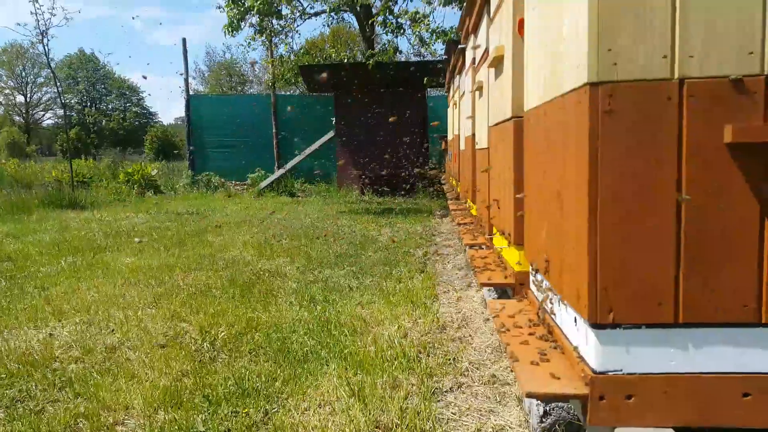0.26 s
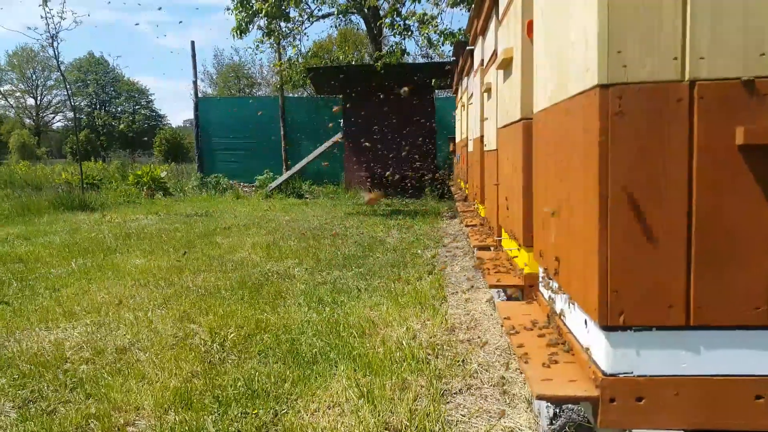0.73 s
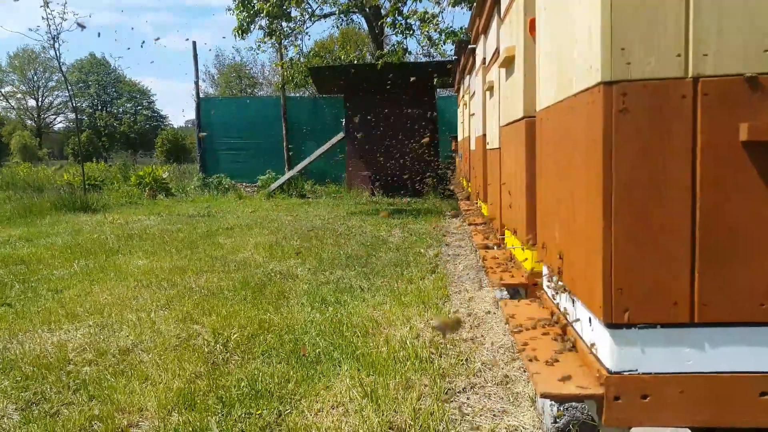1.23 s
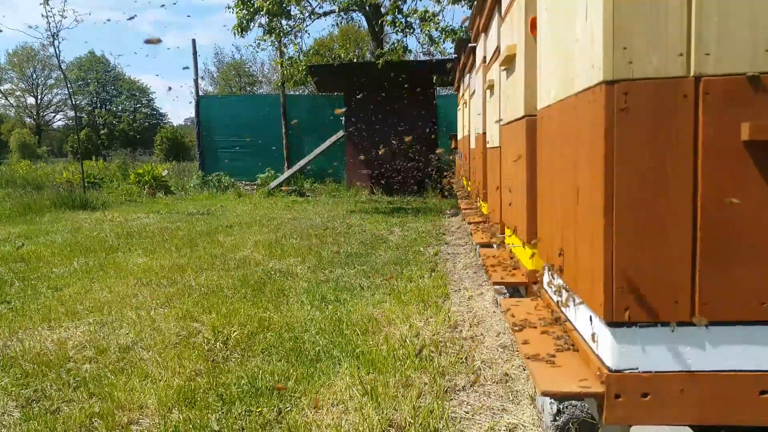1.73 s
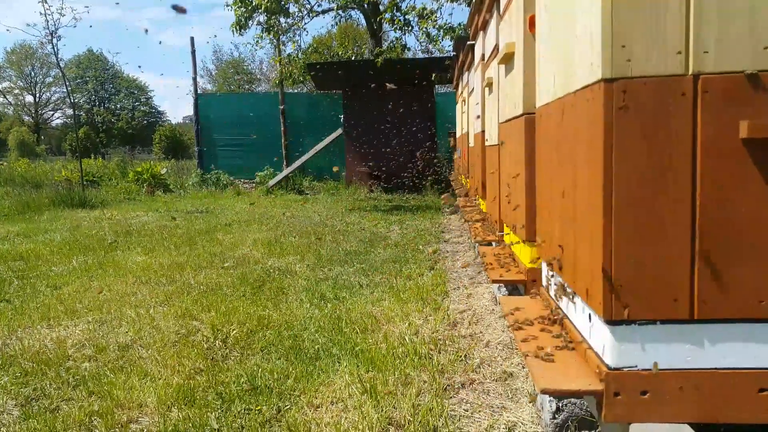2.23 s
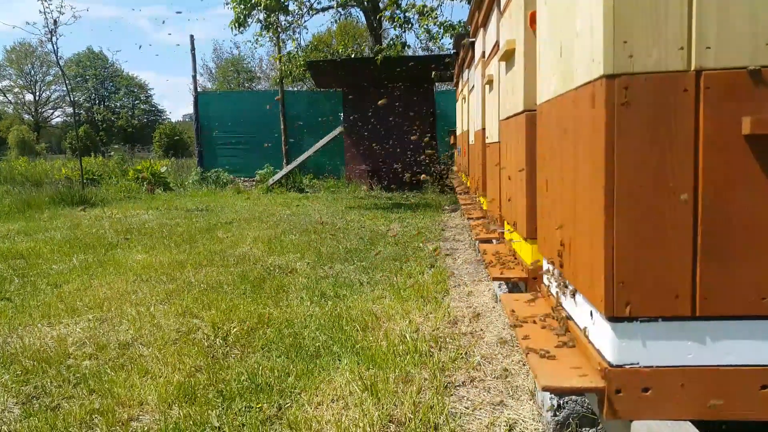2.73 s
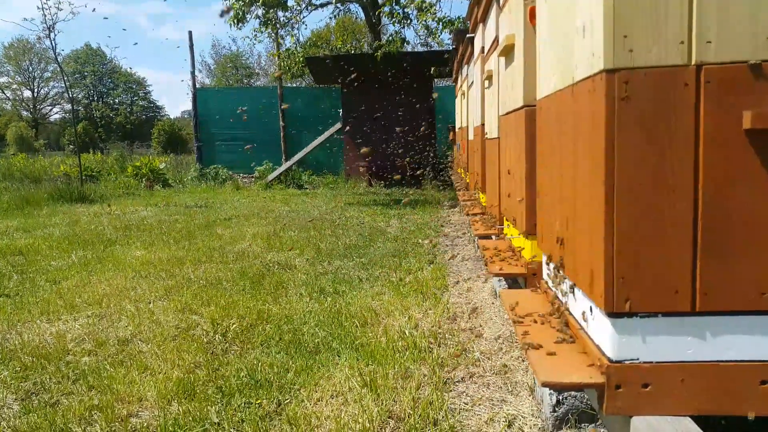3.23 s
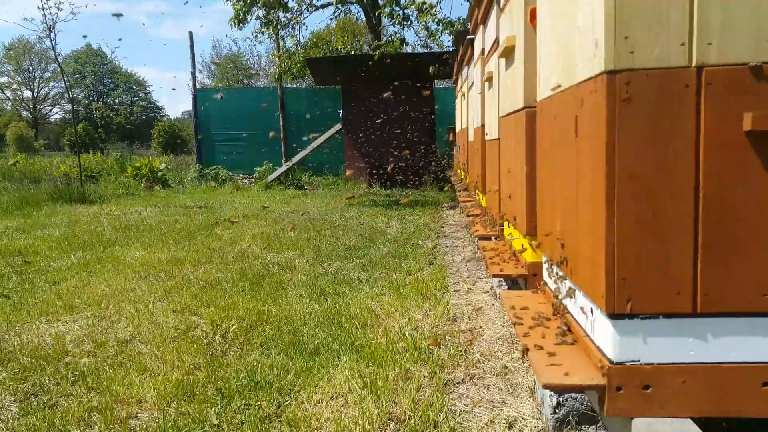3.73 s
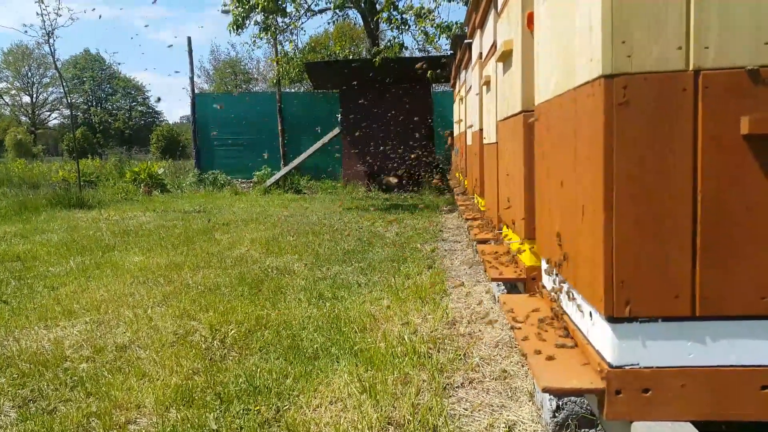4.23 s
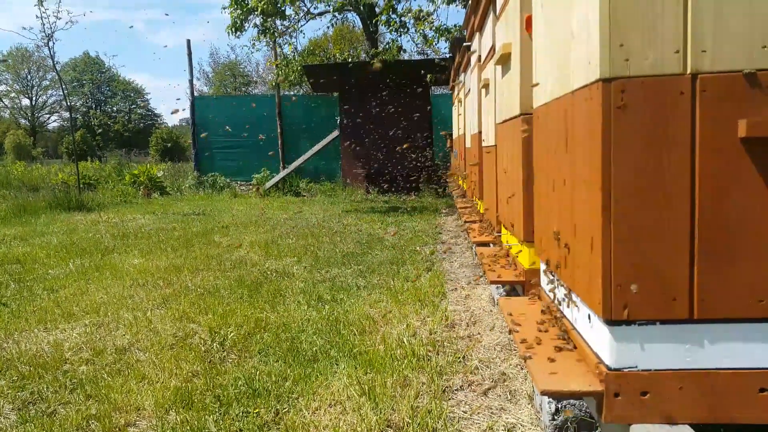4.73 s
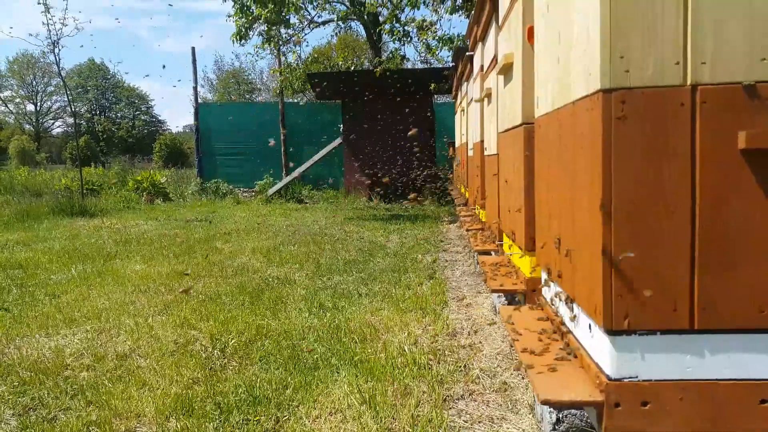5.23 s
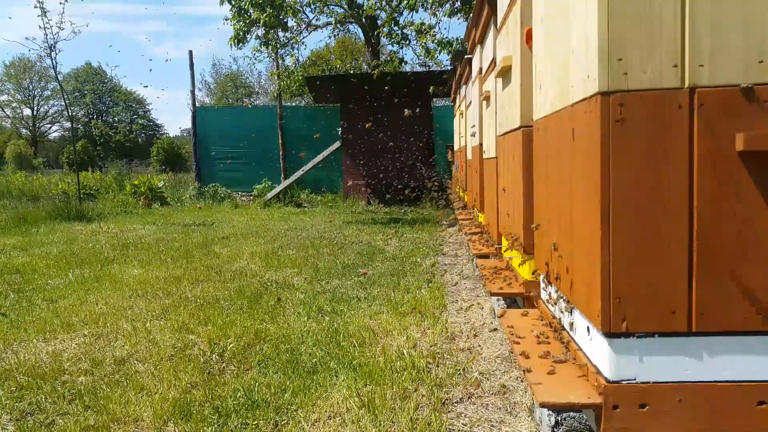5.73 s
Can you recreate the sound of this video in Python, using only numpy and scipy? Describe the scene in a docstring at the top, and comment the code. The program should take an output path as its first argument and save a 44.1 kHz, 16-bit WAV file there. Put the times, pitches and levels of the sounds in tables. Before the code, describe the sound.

A dense, steady buzz of many bees fades in mostly on the right, broken by a sharp pop early and another near the end.

```python
"""A steady buzz fades in from silence, mostly on the right: bees stream in and out of a row of wooden hives.
Each bee is a train of pulses, one per wing stroke; dozens of drifting trains merge into the buzz.
A few bees hum close by for a moment, and a few fan at the entrance with a soft low hum in bouts.
Now and then a bee bumps the microphone (a short damped pop) or grazes it (a thin tick).
Behind them, shaped noise makes a light breeze rumble on both microphones, and a faint hiss."""
import sys
import numpy as np
from scipy import signal
from scipy.fft import rfft, irfft, next_fast_len
from scipy.io import wavfile
from scipy.ndimage import map_coordinates

SR = 44100
rng = np.random.default_rng(int(sys.argv[2]) if len(sys.argv) > 2 else 0)


def to_wav(sig):
    """Store sig (one row per channel, or 1-D mono) as 16-bit WAV at the path in sys.argv[1].

    Samples outside -1..1 are clipped; the rate is SR.
    """
    pcm = np.clip(np.atleast_2d(sig), -1, 1) * 32767
    pcm = np.round(pcm).astype(np.int16)
    wavfile.write(sys.argv[1], SR, pcm.T)  # frames by channels


N = 263277  # length of the scene in samples

# All source levels are before the final gain in record(); colour tables give relative levels.

# tone colour of one wing stroke; columns: f/Hz, level/dB
WING_COLOUR = [(40, -29), (120, 2.5), (235, -1.5), (330, 3), (470, 0), (620, -7), (780, -7), (1000, -2),
               (1380, -2), (1750, -6.5), (2100, -12.5), (3400, -14), (4800, -25), (6300, -35),
               (10000, -43.5)]
# how much of the buzz reaches the left side at each pitch; columns: f/Hz, level/dB
LEFT_SIDE_GAIN = [(230, -19.5), (480, -22), (750, -20), (1300, -27), (2600, -16.5), (4000, -18),
                  (8000, -3.5)]
SWARM_DB = -45.5  # average (rms) level on the right


def swarm():
    """The buzz is loud on the hive side (right) and faint on the lawn side (left)."""
    right = coloured(flight(), WING_COLOUR)
    left = coloured(flight(), WING_COLOUR)
    left = filtered(left, lambda hz: gain_at(LEFT_SIDE_GAIN, hz))
    return np.array([left, right]) * amp(SWARM_DB)


LANDING_DB, NEARBY_DB = -0.5, -7  # levels against the foragers


def flight():
    """Foragers at full speed, slower bees hovering to land, and a few nearer ones with cleaner tones."""
    foragers = wingbeats(pitch_hz=236.8, spread=.065, wander=.042, swerve_db=6, jitter=.018, count=30)
    landing = wingbeats(pitch_hz=206.6, spread=.1, wander=.05, swerve_db=5, jitter=.022, count=24)
    near = wingbeats(pitch_hz=240.8, spread=.04, wander=.045, swerve_db=8, jitter=.004, count=4)
    buzz = scattered(foragers, t60=0.01297)
    buzz = buzz + amp(LANDING_DB) * scattered(landing, t60=.012)
    return buzz + amp(NEARBY_DB) * scattered(near, t60=.015)


KNOTS = 400  # points along each bee's flight path


def wingbeats(pitch_hz, spread, wander, swerve_db, jitter, count):
    """One pulse per wing stroke of each bee; its pitch and nearness drift as it flies."""
    t = np.linspace(0, N / SR, KNOTS)
    pulses = np.zeros(N + 2)
    for rank in np.linspace(-1, 1, count):  # from the slowest bee to the fastest
        drift = wobble(2, KNOTS) + .5 * wobble(11, KNOTS)
        hz = pitch_hz * np.exp(spread * rank + wander * drift)
        beats = rng.random() + (np.cumsum(hz) - hz[0]) * t[1]  # running count of strokes
        # tanh keeps any bee from coming close enough to stand out
        nearness = amp(swerve_db * np.tanh(wobble(4, KNOTS)))
        # small timing errors, in parts of a stroke
        slips = jitter * rng.standard_normal(KNOTS * 10)
        strokes = np.arange(1, int(beats[-1]))
        stroke_s = np.interp(strokes + slips[:len(strokes)], beats, t)
        force = np.interp(stroke_s, t, nearness)
        # a stroke is shared between two neighbouring samples
        whole, part = np.divmod(stroke_s * SR, 1)
        places = np.r_[whole, whole + 1].astype(int)
        shares = np.r_[force * (1 - part), force * part]
        pulses += np.bincount(places, shares, N + 2)
    return unit(pulses[:N] - pulses.mean())


def scattered(x, t60):
    """Hive fronts and ground smear every stroke over a few milliseconds, without changing its colour."""
    t = np.arange(SR // 10) / SR
    echoes = rng.standard_normal(len(t)) * amp(-60 * t / t60)  # 60 dB weaker after t60 seconds

    def smear(hz):
        spectrum = rfft(echoes, 2 * (len(hz) - 1))
        return np.exp(1j * np.angle(spectrum))  # keep only the timing (phase)

    return filtered(x, smear)


VISIT_START_S, VISIT_S, VISIT_RAMP_S = 1.79, 1.12, 0.48
VISIT_DB = -53  # level on the right at full swell


def visitors():
    """A few bees hover close to the right side for a moment: a round hum, mostly the wingbeat itself."""
    wings = wingbeats(pitch_hz=243.4, spread=.025, wander=.03, swerve_db=6.5, jitter=0.0068, count=4)
    # columns: f/Hz, level/dB
    colour = [(100, -25), (240, -1.5), (480, -6.5), (720, -21), (1350, -8), (2200, -21), (6000, -50)]
    hum = coloured(wings, colour) * amp(VISIT_DB)
    left_right = amp([[-22], [0]])
    return hum * swell(VISIT_START_S, VISIT_S, VISIT_RAMP_S) * left_right


FAN_RAMP_S, FAN_IDLE_DB = .25, -63.5  # time to start or stop; hum between bouts (right)
# bouts of fanning, added to the idle hum; columns: start t/s, length t/s, level/dB (right)
FANNING_BOUTS = [(.9, .5, -57), (3.1, 1.34, -56.5), (5.6, .5, -60)]


def fanning():
    """Bees fanning air into the hive beat slowly: a soft low hum that comes in bouts."""
    wings = wingbeats(pitch_hz=147.6, spread=.02, wander=.025, swerve_db=3.5, jitter=0.017, count=6)
    # columns: f/Hz, level/dB
    hum = coloured(wings, [(60, -21), (147, -2.5), (290, -15), (900, -21), (3000, -69)])
    power = amp(FAN_IDLE_DB) ** 2
    for start_s, length_s, db in FANNING_BOUTS:
        power = power + amp(db) ** 2 * swell(start_s, length_s, FAN_RAMP_S)
    left_right = amp([[-12], [0]])
    return hum * np.sqrt(power) * left_right


def swell(start, length, ramp):
    """Rise smoothly from 0 to 1 around start, hold, and fall again around start + length."""
    t = np.arange(N) / SR - start
    height = np.clip(np.minimum(t, length - t) / ramp + .5, 0, 1)
    return np.sin(np.pi / 2 * height) ** 2


# bees hitting the microphone
# columns: t/s, right peak level/dB, left peak level/dB, low edge f/Hz, high edge f/Hz
BUMP_HITS = [(0.7017, -29.5, -57, 150, 2500), (.7285, -2.4, -33, 45, 3400), (0.8284, -26, -42, 30, 650),
             (0.8785, -22.5, -27.5, 256, 1500), (5.3244, -6.5, -34, 30, 2050), (5.4156, -21, -48, 25, 477)]
# ring of the struck microphone; columns: f/Hz, level/dB
CASING_RING = [(25, -30), (55, -13), (85, -2), (115, 0), (260, -4), (420, -4.5), (520, -8), (640, -14),
               (1050, -24), (1400, -17.5), (2000, -27), (3200, -36), (4400, -52), (7000, -75)]
# thud that reaches its other side; columns: f/Hz, level/dB
FAR_THUD = [(25, -32), (70, 0.5), (125, 1), (220, -4.5), (500, -21), (1300, -33), (2200, -46), (5000, -48)]


def bumps():
    """A bee hits the microphone: one sharp push and a quickly damped swing."""
    out = np.zeros((2, N + SR))
    for hit_s, right_db, left_db, low_hz, high_hz in BUMP_HITS:
        left = amp(left_db) * ring(FAR_THUD, 54, high_hz)
        right = amp(right_db) * ring(CASING_RING, low_hz, high_hz)
        start = round(hit_s * SR)
        out[:, start:start + len(right)] += np.array([left, right])
    return out[:, :N]


# light grazes of the casing; columns: t/s, right peak level/dB, left peak level/dB
TICK_TOUCHES = [(2.211, -50, -43), (3.1157, -21.5, -58), (4.258, -52, -47)]
# ring of a tick; columns: f/Hz, level/dB
TICK_RING = [(60, -13), (280, -9), (650, -14), (900, 0), (1300, 2.5), (1800, -8), (2200, -6), (3200, -18.5),
             (5000, -32), (12000, -43)]


def ticks():
    """A grazing touch gives only a thin dry click."""
    touches = np.zeros((2, N))
    for touch_s, right_db, left_db in TICK_TOUCHES:
        touches[:, round(touch_s * SR)] = amp([left_db, right_db])
    click = ring(TICK_RING, 100, 9000)
    return signal.fftconvolve(touches, click[None], axes=1)[:, :N]


def ring(points, low_hz, high_hz, size=8192):
    """Causal answer to a blow, peak 1; a soft contact loses treble, a glancing one bass."""
    hz = np.fft.rfftfreq(size, 1 / SR) + 1
    edges = (1 + (low_hz / hz) ** 6) * (1 + (hz / high_hz) ** 4)
    gain = gain_at(points, hz) / np.sqrt(edges)
    # minimum phase: fold the cepstrum so the energy comes as early as possible
    cepstrum = irfft(np.log(np.maximum(gain, 1e-6)))
    folded = np.r_[0, 2 * cepstrum[1:size // 2]]
    wave = irfft(np.exp(rfft(folded, size)))
    return wave / np.abs(wave).max()


GUST_RISE_S, CALM_LEFT_DB, CALM_RIGHT_DB = 0.043, -54, -55  # calm: rumble between gusts
# gusts added to the calm rumble; columns: start t/s, dying time t/s, left level/dB, right level/dB
BREEZE_GUSTS = [(1.29, .14, -51, -48), (2.7, 0.23, -48.5, -68), (3.1, 0.32, -62, -44),
                (3.55, .07, -51, -47), (4.22, 0.22, -54, -48), (4.63, 0.28, -50, -68),
                (5.74, 0.12, -59, -53)]
# colour of the wind rumble on each side; columns: f/Hz, level/dB (per Hz)
LEFT_RUMBLE = [(15, -13), (50, 1.5), (105, -1), (170, -7), (290, -22), (700, -29), (2000, -58)]
RIGHT_RUMBLE = [(15, -30), (40, -11), (75, 0), (130, -1.5), (200, -7.5), (320, -13.5), (700, -19.5),
                (2000, -62)]


def breeze():
    """Each gust rises quickly and dies away; its eddies rumble on each microphone separately."""
    power = amp([[CALM_LEFT_DB], [CALM_RIGHT_DB]]) ** 2
    for start_s, dying_s, left_db, right_db in BREEZE_GUSTS:
        age = np.maximum(np.arange(N) / SR - start_s, 0)
        rise = age / GUST_RISE_S
        fall = np.exp((GUST_RISE_S - age) / dying_s)
        gust = np.minimum(rise, fall)
        power = power + (amp([[left_db], [right_db]]) * gust) ** 2
    # each side also flutters at random
    left = coloured(rng.standard_normal(N), LEFT_RUMBLE) * amp(1.5 * wobble(17, N))
    right = coloured(rng.standard_normal(N), RIGHT_RUMBLE) * amp(2.6 * wobble(26, N))
    return np.array([left, right]) * np.sqrt(power)


# colour of the microphone hiss on each side; columns: f/Hz, level/dB (per Hz)
LEFT_HISS = [(100, -7), (6000, -12), (9000, -7.5), (12000, -3), (15500, -1.5)]
RIGHT_HISS = [(100, -13), (8300, -6), (11000, 2.5), (13000, -0.5), (15500, 0.5)]


def hiss():
    """Faint self-noise of the two microphones."""
    left = amp(-70) * coloured(rng.standard_normal(N), LEFT_HISS)
    right = amp(-69.0) * coloured(rng.standard_normal(N), RIGHT_HISS)
    return np.array([left, right])


def amp(db):
    """Decibels to gain."""
    return 10 ** (np.asarray(db) / 20)


def unit(x):
    """Scale to an average (rms) level of 1."""
    return x / np.sqrt(np.mean(x ** 2) + 1e-20)


def gain_at(points, hz):
    """Read the gain between (f/Hz, level/dB) points, on a log frequency axis."""
    f, db = np.transpose(points)
    return amp(np.interp(np.log(hz + 1), np.log(f), db))


def wobble(rate, size):
    """A smooth random curve over the whole scene, rate knots a second."""
    span = rate * N / SR
    knots = rng.standard_normal(int(span) + 4)
    return map_coordinates(knots, [np.linspace(1, span + 1, size)])


def filtered(x, response):
    """Multiply the spectrum of x by a response of frequency."""
    m = next_fast_len(N + SR // 2)  # spare room so the end does not wrap onto the start
    hz = np.fft.rfftfreq(m, 1 / SR)
    return irfft(rfft(x, m) * response(hz), m)[..., :N]


def coloured(x, points):
    """Shape the spectrum of x by the points, then scale to rms 1."""
    return unit(filtered(x, lambda hz: gain_at(points, hz)))


def scene():
    """Bees, bumps and breeze over a faint microphone hiss."""
    bees = swarm() + visitors() + fanning()
    touches = bumps() + ticks()
    return bees + touches + breeze() + hiss()


FADE_START_S, FADE_S = 0.27, 0.29  # a straight fade from silence
TOP_HZ = 15800  # band limit


def record(dry, gain_db=1.0):
    """The sound fades in and keeps nothing above the band limit."""
    fade = np.clip((np.arange(N) / SR - FADE_START_S) / FADE_S, 0, 1)
    return filtered(dry * amp(gain_db) * fade, lambda hz: hz < TOP_HZ)


dry = scene()
out = record(dry)
to_wav(out)
```